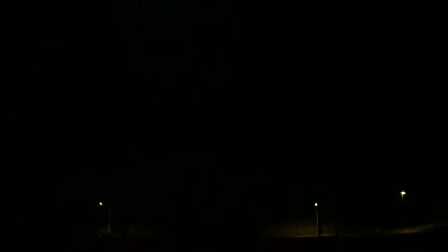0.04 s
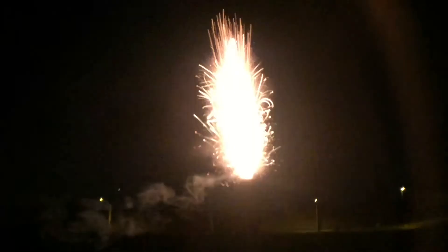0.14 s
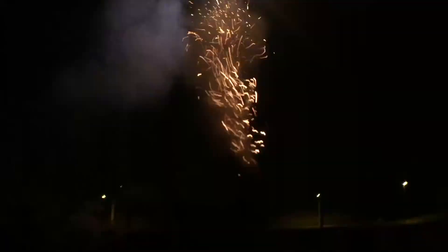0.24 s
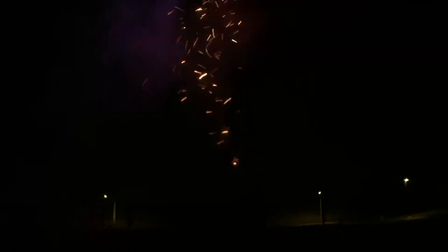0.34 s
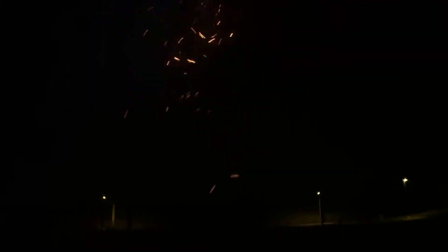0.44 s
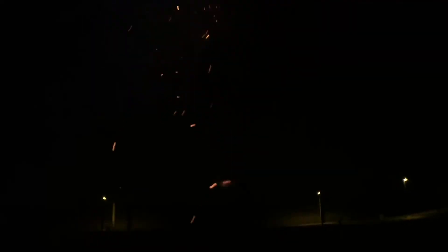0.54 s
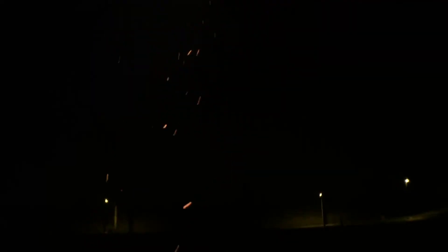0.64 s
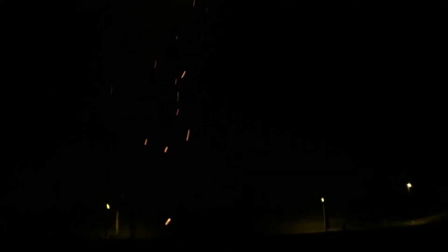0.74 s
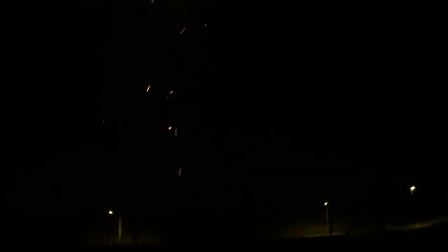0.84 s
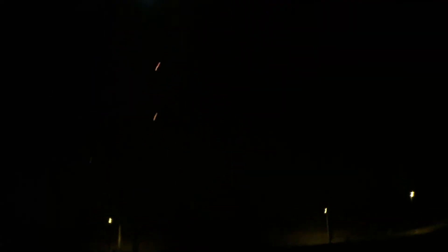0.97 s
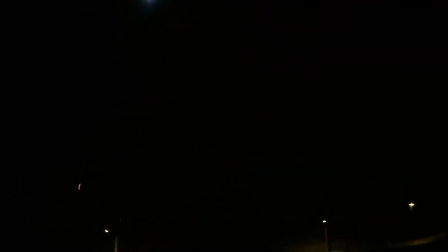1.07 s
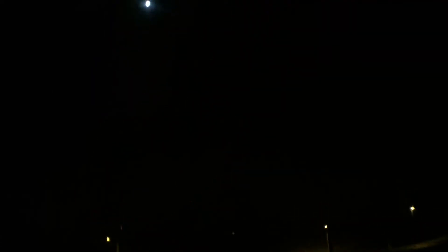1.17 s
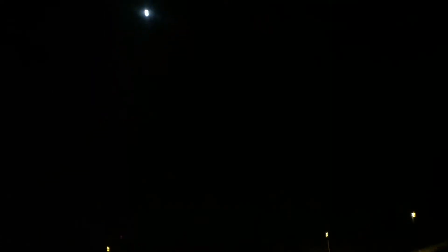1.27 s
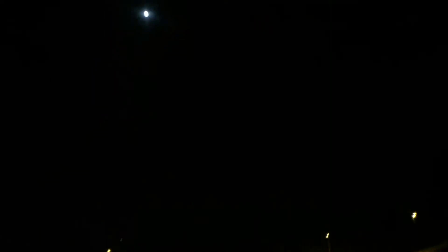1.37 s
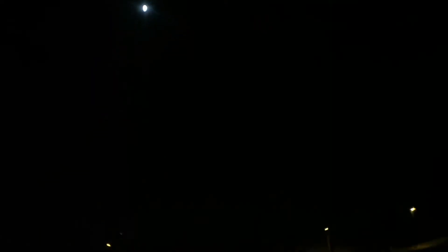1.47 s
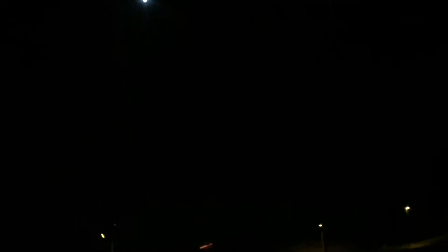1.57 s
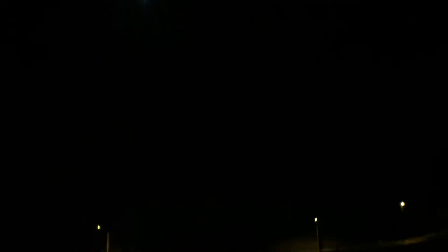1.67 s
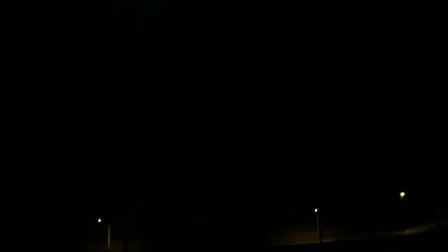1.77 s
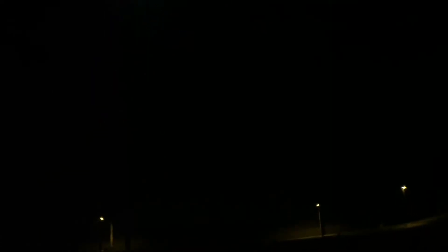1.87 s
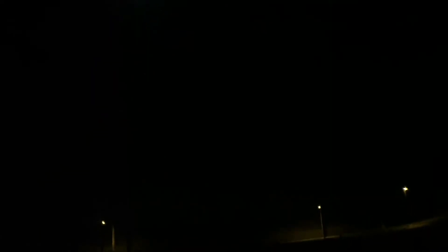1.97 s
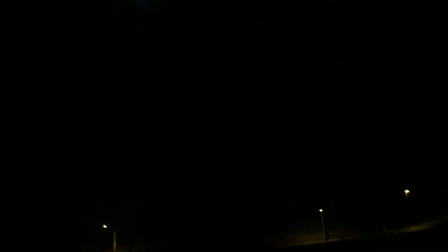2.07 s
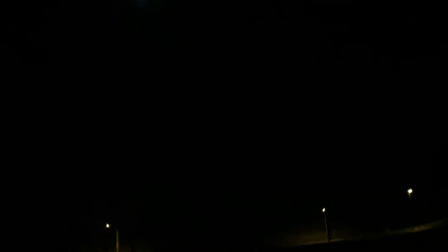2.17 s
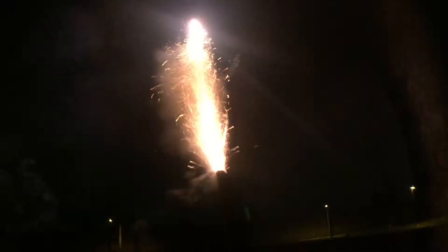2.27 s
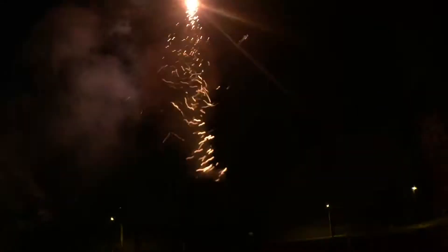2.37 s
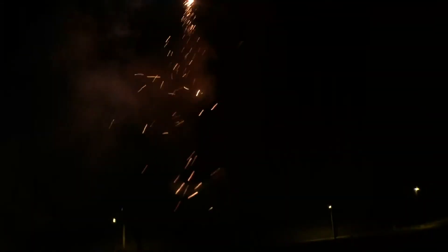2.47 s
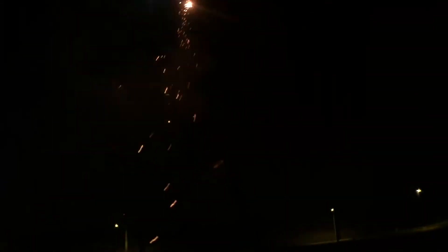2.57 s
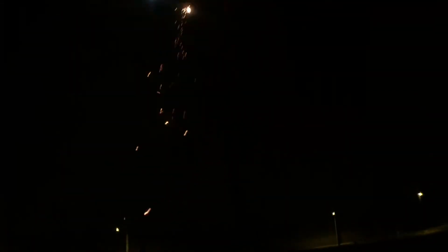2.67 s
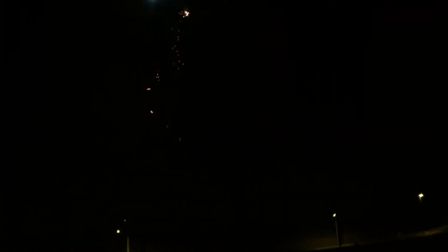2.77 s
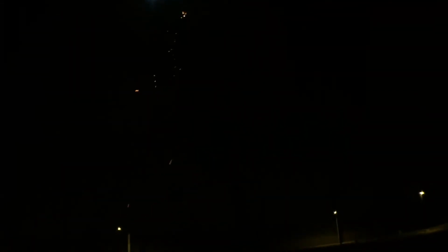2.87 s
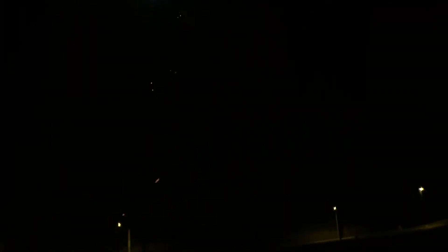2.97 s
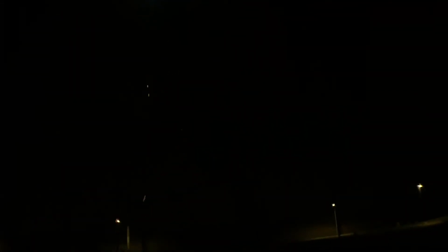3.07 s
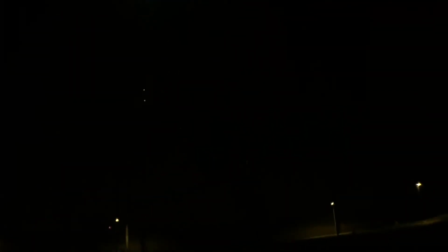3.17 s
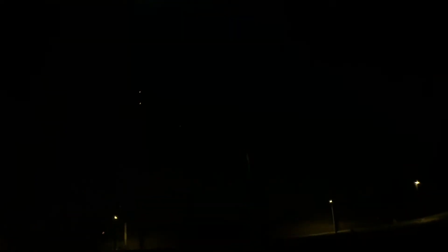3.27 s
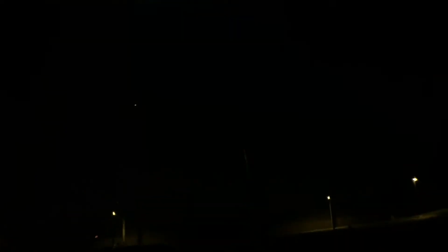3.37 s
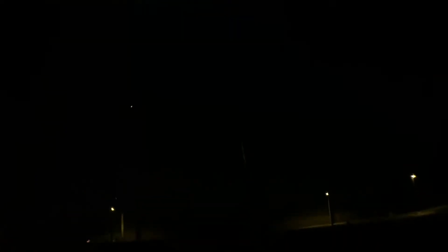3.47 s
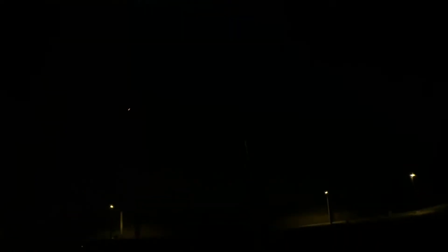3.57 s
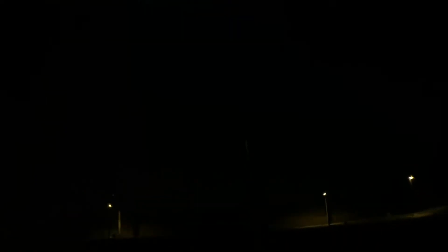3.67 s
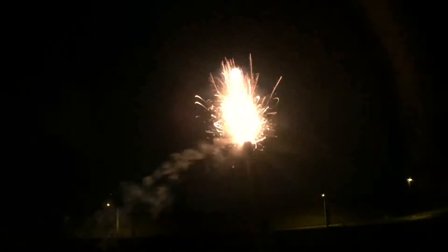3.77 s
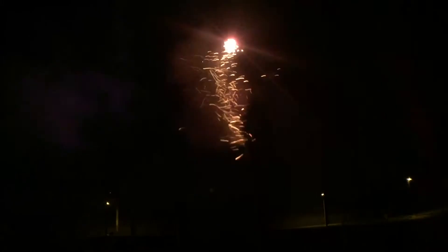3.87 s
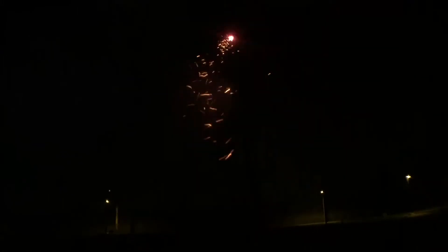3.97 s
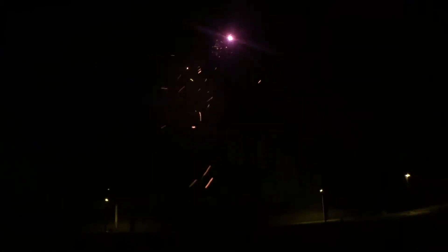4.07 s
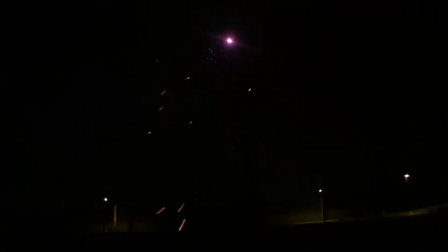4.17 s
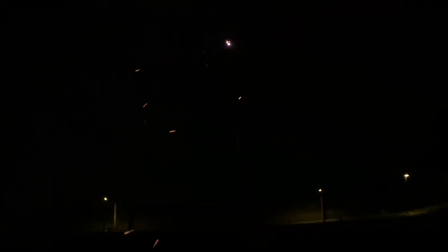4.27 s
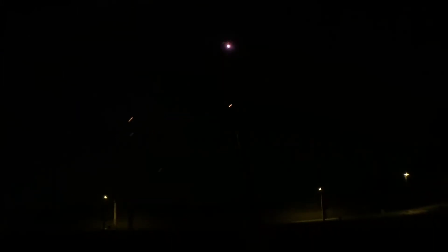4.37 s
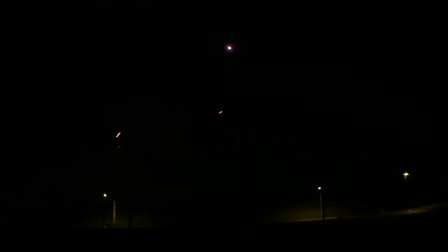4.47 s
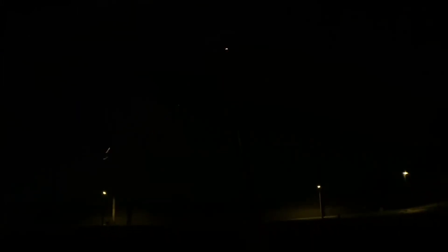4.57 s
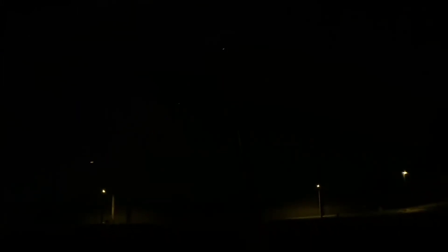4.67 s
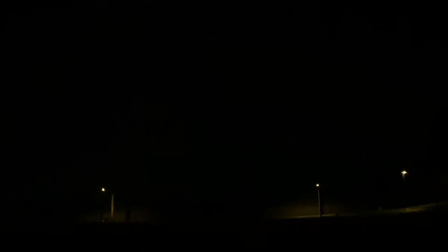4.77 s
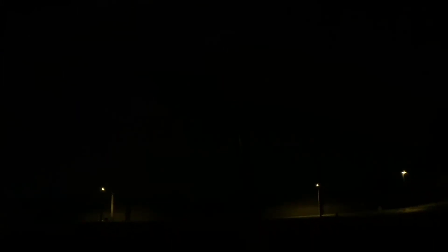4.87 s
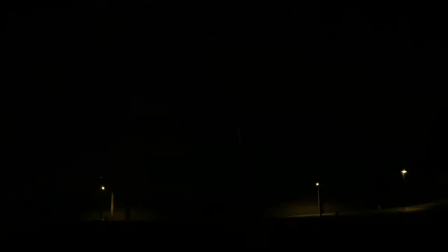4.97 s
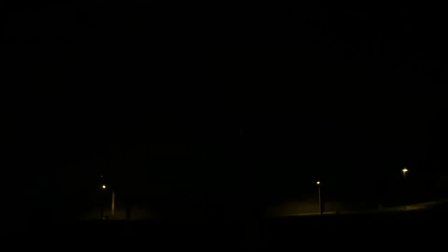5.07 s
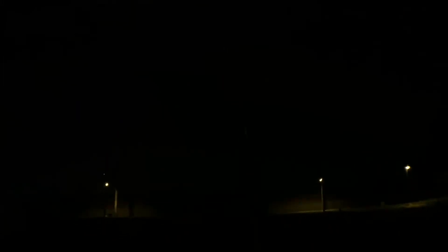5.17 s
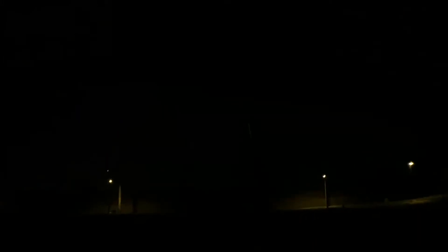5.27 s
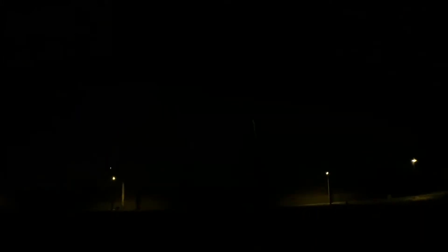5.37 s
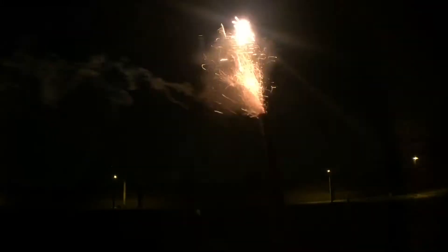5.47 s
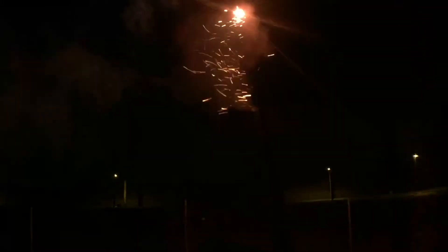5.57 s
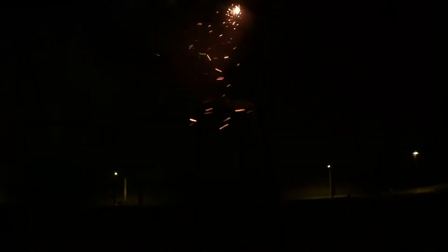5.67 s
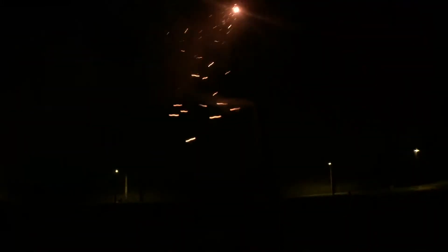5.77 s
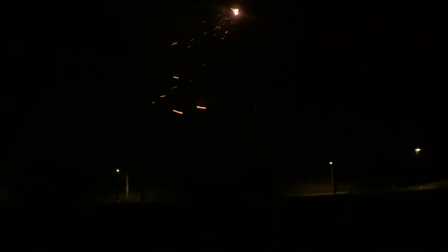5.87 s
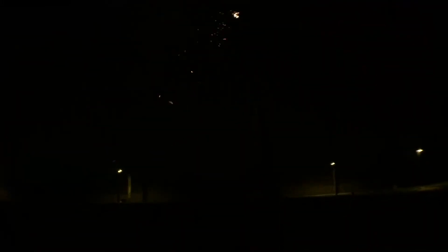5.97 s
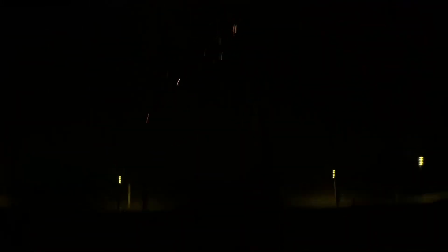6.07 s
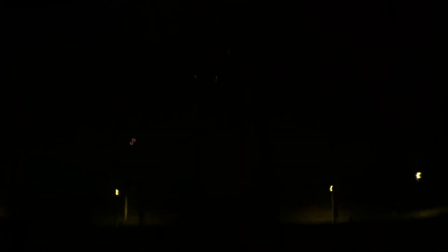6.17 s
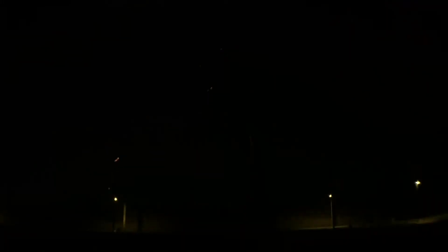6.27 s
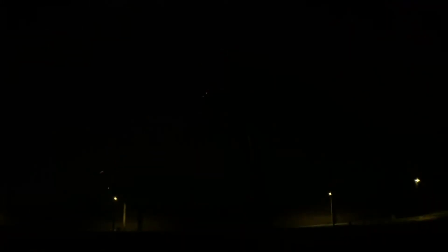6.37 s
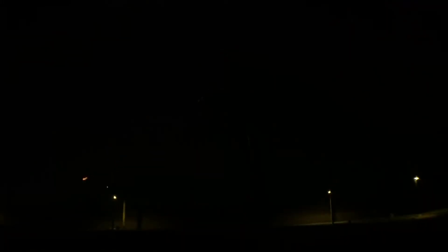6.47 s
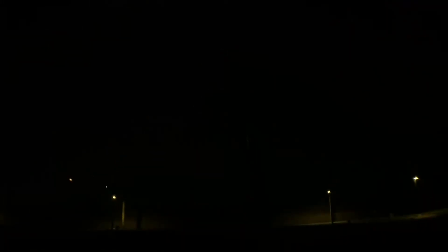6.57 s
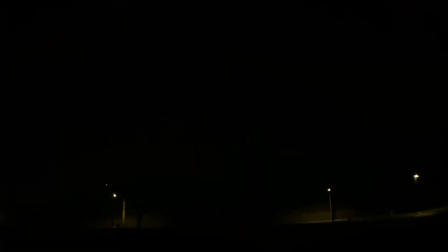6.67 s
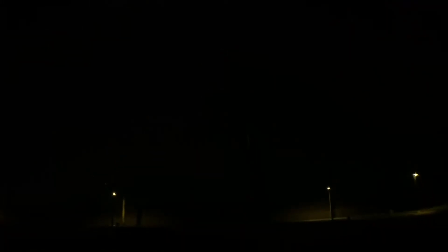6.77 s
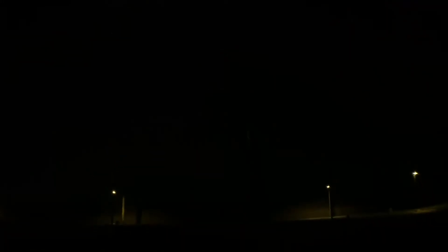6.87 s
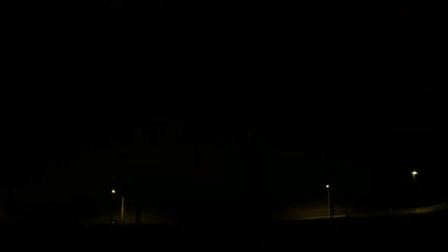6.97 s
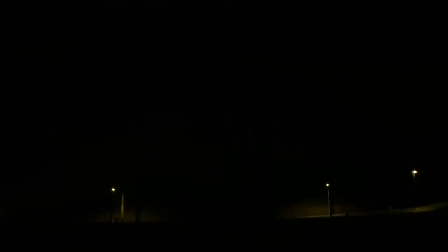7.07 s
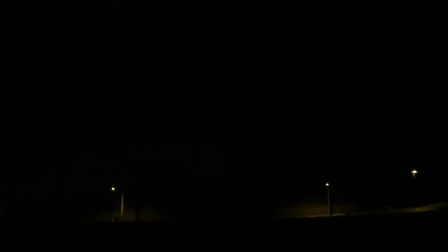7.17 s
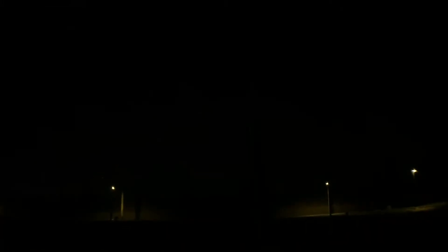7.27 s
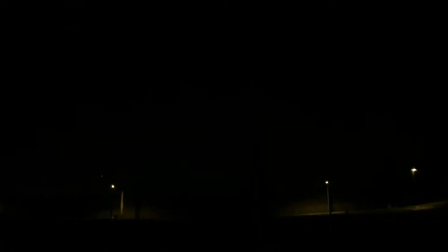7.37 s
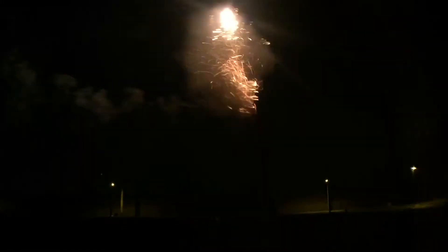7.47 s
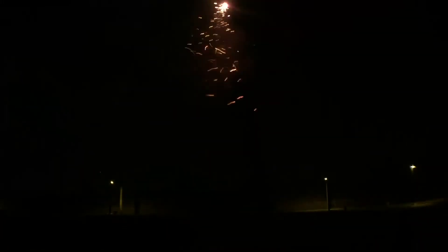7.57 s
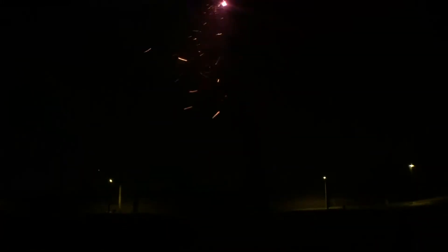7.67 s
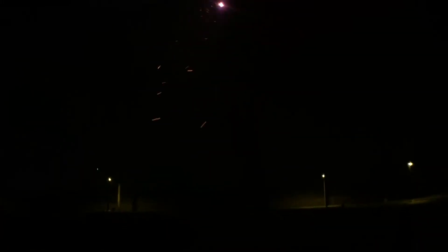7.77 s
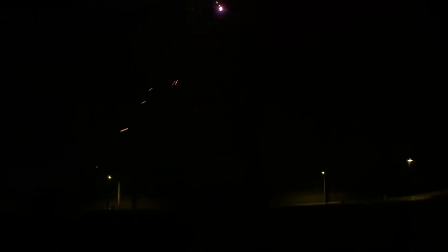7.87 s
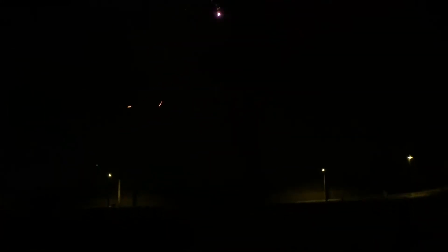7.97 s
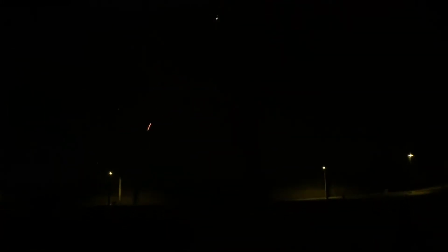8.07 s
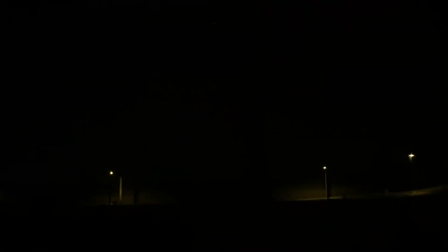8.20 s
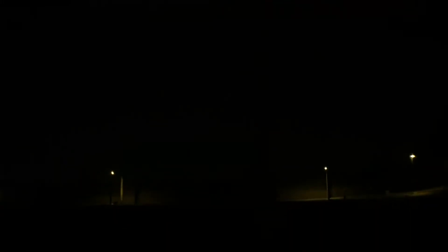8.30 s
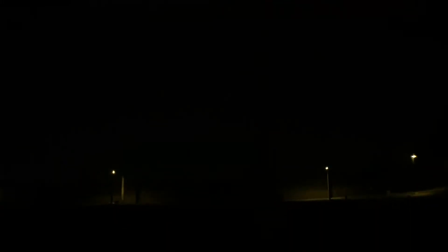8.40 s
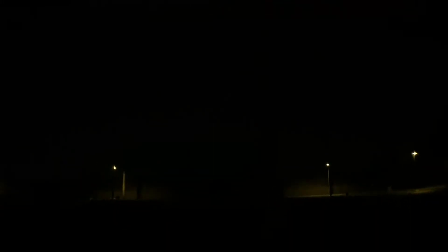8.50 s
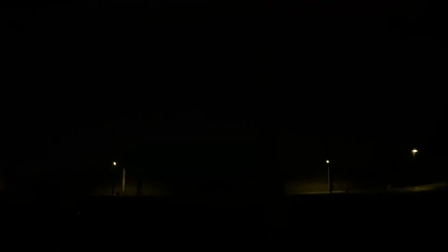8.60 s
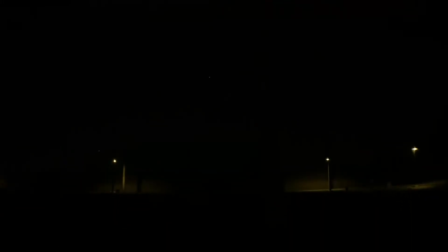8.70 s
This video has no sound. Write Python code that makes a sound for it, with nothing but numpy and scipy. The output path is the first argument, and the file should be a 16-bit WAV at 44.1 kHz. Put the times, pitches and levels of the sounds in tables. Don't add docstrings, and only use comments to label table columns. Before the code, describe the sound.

Five explosive pops from a close firework tube overload the microphone, at uneven gaps of one and a half to two seconds. Each cracks, then rushes away in a thin breathy tail, with a muffled slap from distant walls after most. A thin, crackly fuse hiss with airy whistles continues between them, over low lumpy wind on the microphone and a soft far road. After the last shot comes a short moan, a clear echo and a wind knock.

```python
import sys
import numpy as np
from scipy import signal
from scipy.fft import rfft, irfft, next_fast_len
from scipy.io import wavfile
from scipy.ndimage import uniform_filter1d, map_coordinates

SR = 44100
rng = np.random.default_rng(int(sys.argv[2]) if len(sys.argv) > 2 else 0)


def wrap_up_sound(samples):
    columns = np.atleast_2d(samples).T
    tamed = np.clip(columns, -1, 1)
    steps = np.round(tamed * 32767).astype(np.int16)
    wavfile.write(sys.argv[1], SR, steps)


def boost(x):
    u = np.asarray(x, float) / 20
    return 10 ** u


N = 385431


def evened(x):
    return x / np.sqrt(np.mean(x ** 2) + 1e-20)


def read(points, hz, outside=None):
    point_hz, value = np.transpose(points)
    return np.interp(np.log(hz + 1), np.log(point_hz + 1), value, outside, outside)


def curve(table):
    s, *columns = np.transpose(table)
    return [np.interp(np.arange(N) / SR, s, column) for column in columns]


def coloured(spectrum, size):
    fast = next_fast_len(size, real=True)
    gain = boost(read(spectrum, np.fft.rfftfreq(fast, 1 / SR), -120))
    noise = irfft(rfft(rng.standard_normal(fast)) * gain, fast)
    return evened(noise[:size])


def wander(top_hz, size=N):
    return coloured([(0.057 * top_hz, 0), (top_hz, -6), (2.9 * top_hz, -30)], size)


def add(mix, s, sound):
    part = mix[round(s * SR):][:len(sound)]
    part += sound[:len(part)]


def resonate(x, hz, width_hz):
    turn = np.exp(2j * np.pi * np.cumsum(hz) / SR)
    r = np.exp(-np.pi * width_hz / SR)
    return 2 * (turn * signal.lfilter([1 - r], [1, -r], x / turn)).real


def resonate_twice(x, hz, first_width_hz, second_width_hz):
    return resonate(resonate(x, hz, first_width_hz), hz, second_width_hz)


def lobe(t, length):
    u = np.maximum(t, 0) / length
    return (u * np.exp(1 - u)) ** 2


def bump(s, half):
    middle = round(SR * s)
    at = np.arange(max(middle - SR // 2, 0), min(middle + SR // 2, N))
    return at, np.exp(-((at / SR - s) / half) ** 2)


FIRED = [.1612, 2.2425, 3.7926, 5.4440, 7.4396]
# jet_level_db, rise_s, hold_s, fall_by_60_db_s, star_rush_level_db
SHOTS = [(-2, 0.0059, 0.016, 0.044, -25), (-6.5, 0.011, 0.018, 0.091, -31.5),
         (-5, 0.0057, 0.0075, 0.068, -30), (-1.5, 0.0099, 0.0074, 0.064, -31),
         (-7.5, 0.0045, 0.015, 0.036, -22.5)]
# suction_height, crest_height, crest_length_s, trough_height, trough_length_s
PUSHES = [(1.3, 1.38, .011, 0.15, 0.059), (0.24, 0.27, 0.025, .08, 0.049),
          (0.27, 1.3, 0.0043, 0.104, 0.026), (0.079, 0.48, 0.014, 0.15, 0.027),
          (0.41, 1.93, 0.013, 0.49, 0.06)]
# delay_s, height
FRONTS = [(.0085, 1.3), (.0054, .1), (.0055, .1), (.006, .1), (.0078, 2.5)]
# screech_level_db, screech_hz, boom_level_db, bore_pitch_factor
VOICES = [(2.5, 6060, -29.5, 0.563), (7, 5300, -5.5, 1.02), (3.5, 5300, -7.5, 0.96),
          (-6, 5500, -10.5, 0.685), (3, 5104, -12, 0.48)]
LEAD_S = .012


def shots():
    out = np.zeros(N)
    for s, *settings in zip(FIRED, SHOTS, PUSHES, FRONTS, VOICES):
        add(out, s - LEAD_S, shot(*settings))
    return out


def shot(blast, push, front, voice):
    t = np.arange(SR // 2) / SR - LEAD_S
    *jet_settings, rush_db = blast
    suction, crest, length, trough, slow = push
    delay, height = front
    air = crest * lobe(t - delay, length)
    air -= suction * lobe(t, 0.0058)
    air -= trough * lobe(t - delay, slow)
    steep_rise = np.clip((t - delay) / 0.00036, 0, 1)
    air += height * steep_rise * np.exp(-abs(t - delay) / 0.0069)
    return jet(t, *jet_settings, voice) + star(t, rush_db) + air


# pitch_hz, level_db (per Hz)
JET_COLOUR = [(60, -3), (250, -1.5), (600, 2.5), (1100, -4.5), (2500, -4.5), (4000, -6.5), (6500, -11),
              (9000, -21.5), (16000, -44)]
# pitch_hz, width_hz, level_db
TUBE = [(266, 61, -2), (458, 31, -0.5), (743.4, 27, -2), (1055, 92, -1), (1690, 200, -6.5)]


def jet(t, db, rise, hold, t60, voice):
    screech_db, screech_hz, boom_db, pitch_factor = voice
    roar, flat = coloured(JET_COLOUR, len(t)), np.ones(len(t))
    screech = evened(resonate(roar, flat * screech_hz, 1300)) * boost(screech_db - 60 * t / 0.064)
    boom = np.zeros(len(t))
    for hz, width, level_db in TUBE:
        ring = resonate_twice(roar, flat * hz * pitch_factor, 2.7 * width, 2.7 * width)
        boom += boost(level_db) * evened(ring)
    boom = evened(boom) * boost(boom_db) * np.clip(t / 0.013, 0, 1)
    opening = np.clip(t / .001, 0, 1) * (.12 + .88 * np.clip(t / rise, 0, 1))
    swell = .03 * np.exp(np.minimum(t, 0) / .004)
    shape = np.maximum(opening, swell) * boost(-60 * np.maximum(t - rise - hold, 0) / t60)
    return boost(db + 2.74 * wander(230, len(t))) * shape * (roar + screech + boom)


# pitch_hz, level_db (per Hz)
RUSH_COLOUR = [(200, -37.5), (700, -10.5), (2000, -0.5), (4000, -1), (7000, -4.5), (10000, -14.5),
               (16000, -25)]
# pitch_hz, fall_by_60_db_s
RUSH_FALL = [(500, 0.74), (3000, 0.53), (8000, 0.39), (14000, 0.22)]


def star(t, db):
    hz, frame_s, z = signal.stft(coloured(RUSH_COLOUR, len(t)), SR, nperseg=256)
    patches = uniform_filter1d(rng.standard_normal(z.shape), 8, 0)
    patches = evened(uniform_filter1d(patches, 8, 1))
    fall_db = 60 * frame_s / read(RUSH_FALL, hz)[:, None]
    rush = signal.istft(z * boost(2.0 * patches - fall_db), SR, nperseg=256)[1][:len(t)]
    return boost(db) * np.clip(t / 0.0033, 0, 1) * rush


# time_s, level_db, pitch_hz
MOAN = [(7.522, -40, 1600), (7.54, -30, 1750), (7.565, -29, 1700), (7.6, -33, 1400), (7.64, -38, 1180),
        (7.68, -47, 1050)]


def moan():
    level_db, hz = curve(MOAN)
    tone = resonate_twice(rng.standard_normal(N), hz, 300, 330) * boost(0.62 * wander(90))
    t = np.arange(N) / SR
    fade_in = np.clip((t - MOAN[0][0]) / .01, 0, 1)
    fade_out = np.clip((MOAN[-1][0] - t) / 0.034, 0, 1)
    return boost(level_db) * evened(tone) * fade_in * fade_out


# start_s, peak_level_db
SLAPS = [(0.3974, -30.5), (3.9065, -30), (4.2512, -27.5), (5.9025, -30), (7.8989, -16.5)]
# pitch_hz, level_db (per Hz)
SLAP_COLOUR = [(290, -38), (500, -7), (727, 6), (1740, -22), (2190, 2), (3340, -12), (3810, -6.5),
               (9000, -62), (11700, -53), (19800, -120)]


def slaps():
    out, t = np.zeros(N), np.arange(3000) / SR
    for s, db in SLAPS:
        shape = np.minimum(t / 0.00086, 1) * boost(-60 * np.maximum(t - .007, 0) / 0.055)
        add(out, s - .002, boost(db - 11) * shape * coloured(SLAP_COLOUR, len(t)))
    return out


# time_s, vigour_db
FUSE = [(0, -7), (.14, -13), (.36, 7.5), (.6, 4), (1.15, 4), (1.5, 2), (1.86, -1), (2.68, 3.5), (3.1, -1.5),
        (3.76, -1.5), (4.0, 4.5), (4.5, 2.5), (5.4, -6), (5.7, 2), (7.05, -3.5), (7.42, 5), (7.75, 0.5),
        (8.74, -3)]
# peak_s, half_length_s, level_db
FLARES = [
    (2.16, .17, -74.5),
    (4.56, .15, -77),
    (7.4, .22, -76),
]
# pitch_hz, level_db (per Hz)
HISS_COLOUR = [(1200, -23), (2300, -7.5), (3500, -6.5), (5000, -7), (6500, -9.5), (8000, -19.5),
               (10000, -37.5)]
FIZZ_COLOUR = [(7000, -7.5), (8600, -2.5), (10500, -9), (12000, -24.5)]
AIR_COLOUR = [(10000, -13), (11500, 3), (14000, -6.5), (16500, -12)]
# delay_s, share
BOUNCES = [
    (.00042, 0.071),
    (.0012, 0.14),
    (.0023, .3),
]


def fuse():
    vigour_db = uniform_filter1d(curve(FUSE)[0], size=2000)
    flare = np.zeros(N)
    for s, half, db in FLARES:
        at, shape = bump(s, half)
        flare[at] += boost(db) * shape
    burn = boost(-50 + 0.38 * vigour_db) * coloured(HISS_COLOUR, N)
    burn += np.hypot(boost(-71.5 + vigour_db), boost(4.5) * flare) * coloured(FIZZ_COLOUR, N)
    burn += (boost(-94 + .9 * vigour_db) + flare) * coloured(AIR_COLOUR, N)
    burn = banded(burn) + whistles()
    burn *= boost(0.975 * wander(30) + 0.37 * wander(300))
    out = burn.copy()
    for delay, share in BOUNCES:
        path = SR * delay * (1 + 0.044 * wander(0.24))
        out += share * map_coordinates(burn, [np.arange(N) - path], order=1)
    return out


def banded(x):
    z = signal.stft(x, nperseg=512)[2]
    bands = uniform_filter1d(rng.standard_normal(z.shape), size=4, axis=0)
    bands = evened(uniform_filter1d(bands, size=80, axis=1))
    return signal.istft(z * boost(1.2 * bands), nperseg=512)[1][:N]


# start_s, peak_s, end_s, starting_pitch_hz, level_db
WHISTLES = [(.25, 0.498, 1.0, 3600, -53.5), (1.049, 1.42, 1.69, 4680, -53.5), (.9, 1.204, 1.394, 3170, -58),
            (2.35, 2.6, 3.4, 3310, -56), (2.6, 3.0, 3.16, 5800, -59), (3.9, 4.206, 5.517, 4080, -61),
            (5.6, 5.996, 6.8, 3770, -56.5), (7.08, 7.356, 7.6, 4960, -49.5),
            (7.117, 7.43, 7.62, 5420, -48.5), (7.51, 7.54, 7.585, 5250, -41), (7.9, 8.05, 8.3, 3220, -56.5)]


def whistles():
    out = np.zeros(N)
    for start, peak, end, first_hz, db in WHISTLES:
        t = np.arange(start, end, 1 / SR)
        hz = first_hz * (1 - 0.11 * (t - start))
        noise = rng.standard_normal(2 * SR)[:len(t)]
        band = evened(resonate_twice(noise, hz, 300, 300))
        add(out, start, boost(db) * np.interp(t, [start, peak, end], [0, 1, 0]) * band)
    return out


# time_s, pitch_hz, height, length_s, flutter_height, flutter_lead_s
KNOCK = (8.3184, 98, 1.3, .0045, .37, .0095)


def knock():
    s, hz, height, length, flutter, lead = KNOCK
    t = np.arange(N) / SR - s
    swing = height * np.exp(-((t - .0016) / length) ** 2)
    swing += flutter * np.exp(-((t + lead / 3) / (1.6 * lead)) ** 4)
    return swing * np.cos(2 * np.pi * hz * t)


# pitch_hz, level_db (per Hz)
BUFFET_COLOUR = [(8, -0.5), (25, -3), (65, -2.5), (100, -8), (140, -42)]
FLUTTER_COLOUR = [(70, -24), (110, 1.5), (160, -5), (210, -14.5), (320, -47.5)]
GUST_COLOUR = [(15, -12.5), (35, -1.5), (65, -2), (95, -9), (140, -47)]
# peak_s, level_db, half_length_s, flutter_db (relative to the gust)
GUSTS = [(.41, -26.5, 0.027, -12.5), (0.811, -18.5, 0.02, -13.5), (1.018, -22.5, 0.027, -6.5),
         (1.227, -11, .03, -21.5), (1.287, -13, 0.023, -20), (1.4, -20.5, 0.094, -23),
         (1.7, -15, 0.013, -14.5), (1.788, -22, 0.036, -14.5), (2.036, -26, .06, -2),
         (2.448, -23.5, .05, -17.5), (3.253, -23, 0.022, -5), (3.628, -26.5, 0.045, -4),
         (4.245, -30, .025, -3.5), (4.65, -26.5, 0.027, -17), (4.967, -16.5, 0.036, -20),
         (5.112, -15, 0.016, -6), (5.287, -23, .03, -2), (6.16, -21.5, .06, -9),
         (6.288, -13.5, 0.0555, -15), (6.42, -23, .08, -13), (7.13, -27, .05, -7.5),
         (7.699, -22, 0.0194, 4.5), (7.778, -16.5, .045, -6.5), (8.161, -24.5, 0.049, -13)]


def wind():
    breeze = boost(-28) * coloured(BUFFET_COLOUR, N) + boost(-36.5) * coloured(FLUTTER_COLOUR, N)
    eddies = boost(0.53 * wander(11.0)) * breeze
    low, high = coloured(GUST_COLOUR, N), coloured(FLUTTER_COLOUR, N)
    for s, db, half, flutter_db in GUSTS:
        at, shape = bump(s, half)
        for air, gain in ((low[at], boost(db)), (high[at], boost(db + flutter_db))):
            gust = shape * air
            eddies[at] += gain * gust * np.linalg.norm(shape) / np.linalg.norm(gust)
    return eddies + 0.27 * (eddies ** 2 - np.mean(eddies ** 2))


# pitch_hz, level_db (per Hz)
TRAFFIC_COLOUR = [(150, -23), (250, -5), (385, -13), (459, -7.5), (547, -8.5), (966, 0), (1090, -3.5),
                  (1860, -11.5), (2240, -19), (2600, -22.5), (3380, -26), (5720, -120)]


def traffic():
    return boost(-39 + 0.37 * wander(17.0)) * coloured(TRAFFIC_COLOUR, N)


def scene():
    firework = shots() + moan() + slaps() + fuse()
    port = resonate(firework, np.full(N, 5300.), 1167)
    return (firework + 0.93 * port + knock() + wind() + traffic())[None]


def roll_off(x):
    return signal.sosfilt(signal.butter(12, 16160, fs=SR, output="sos"), x)


def record(dry):
    rail, knee, edge_hz = .945, 14, 16100
    dry = dry + boost(-79.0) * rng.standard_normal(dry.shape)
    clipped = dry / (1 + abs(dry / rail) ** knee) ** (1 / knee)
    clipped = clipped * signal.windows.tukey(N, 600 / N)
    limit = signal.firwin(255, edge_hz, window=("kaiser", 8), fs=SR)
    return roll_off(signal.filtfilt(limit, 1, clipped))


dry = scene()
out = record(dry)
wrap_up_sound(out)
```